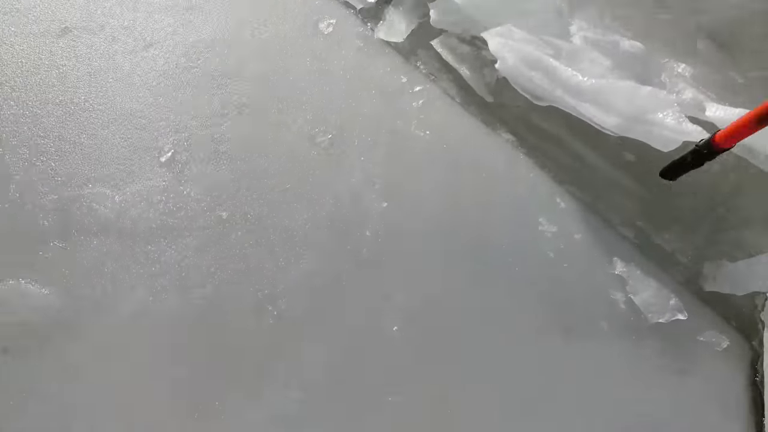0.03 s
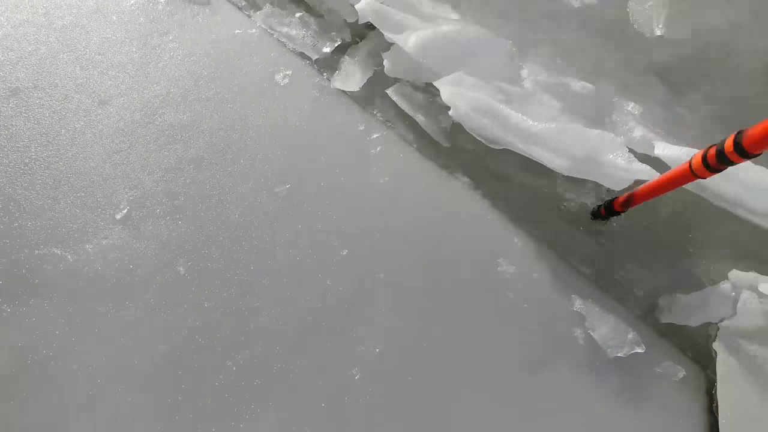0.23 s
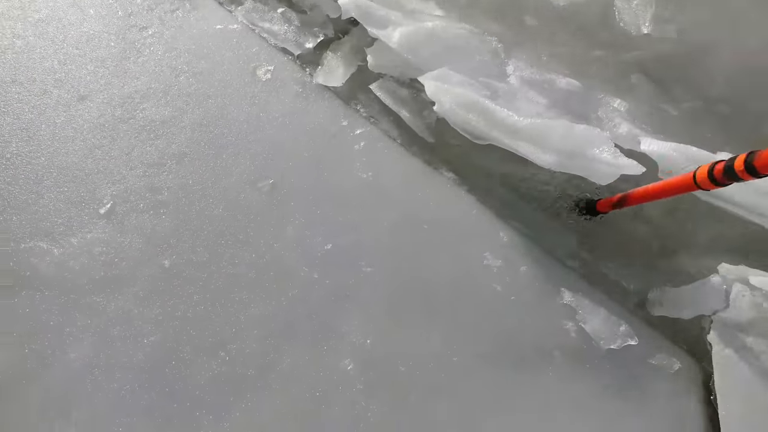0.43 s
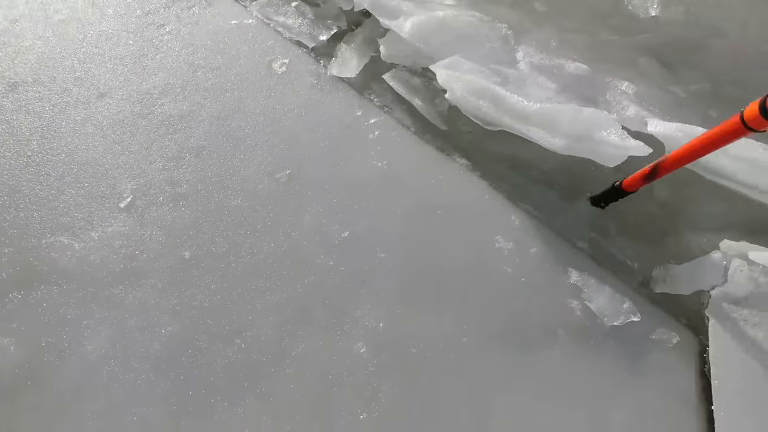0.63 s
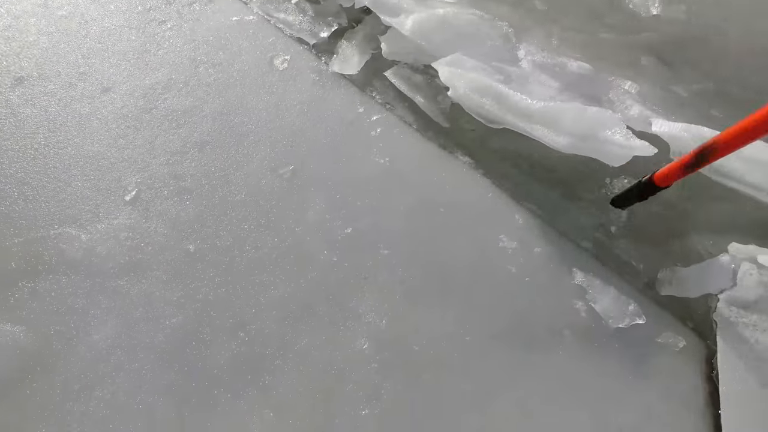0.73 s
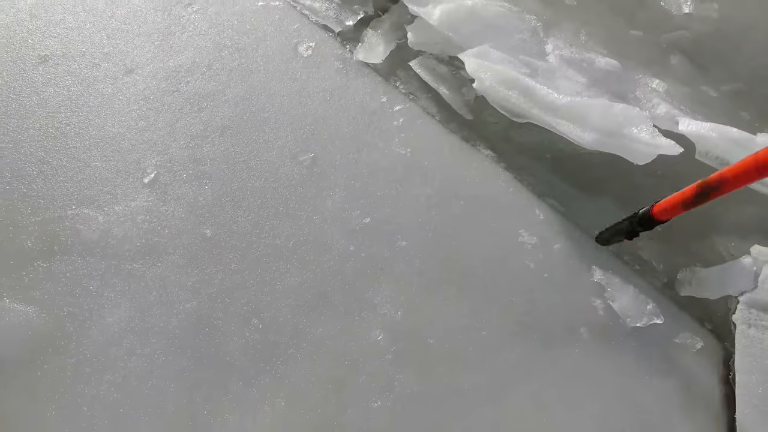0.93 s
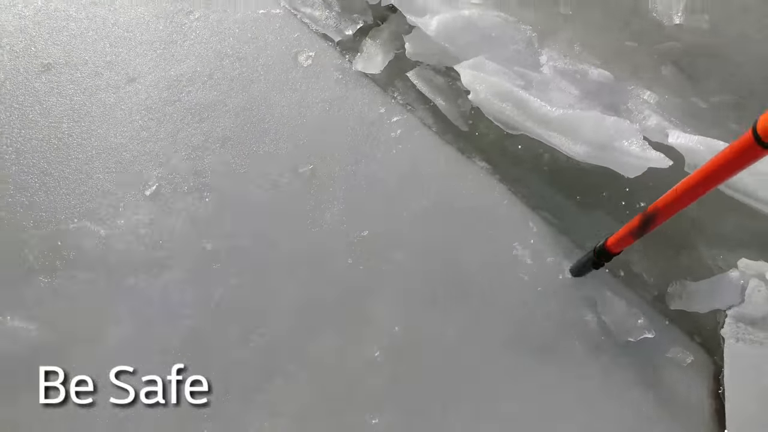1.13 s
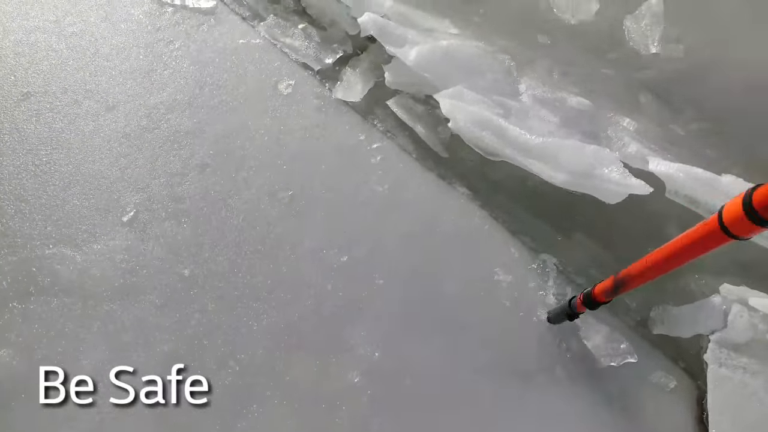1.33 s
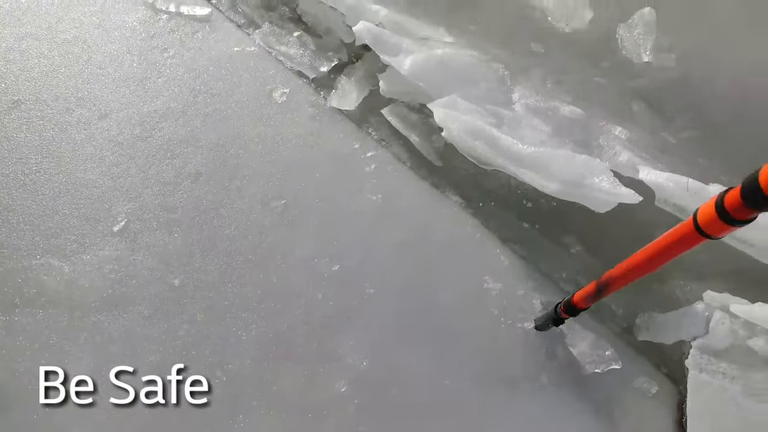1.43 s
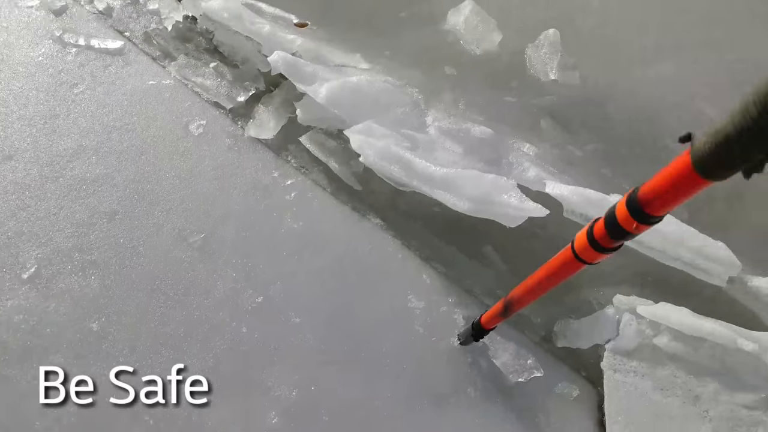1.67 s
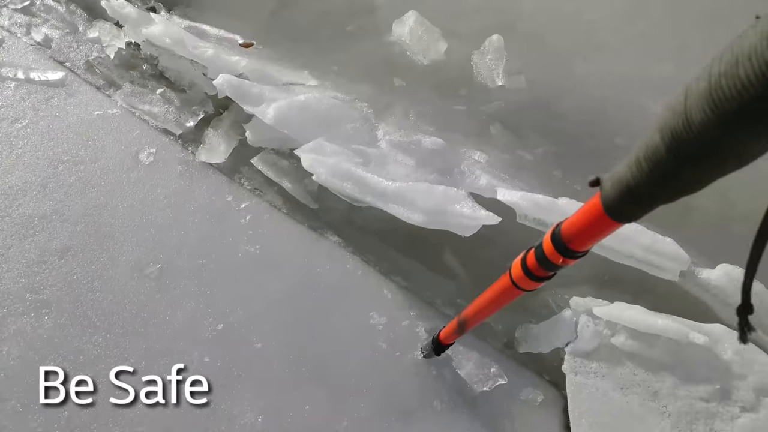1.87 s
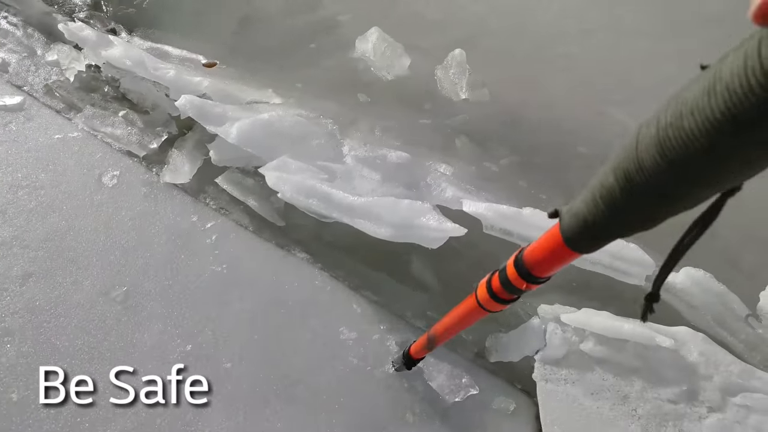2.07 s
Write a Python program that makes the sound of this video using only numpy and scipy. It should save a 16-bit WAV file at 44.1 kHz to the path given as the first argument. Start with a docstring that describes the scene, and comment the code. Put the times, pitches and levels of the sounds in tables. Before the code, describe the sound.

Close, crackling jabs of a pole into wet ice, three in all, the first the longest. Between them the tip grinds through icy grains, chips click and water gulps briefly, over light outdoor wind rumble on the microphone.

```python
"""Pole jabbing thin lake ice.

Three jabs into wet ice near a hand-held microphone, with scraping between them. Each jab is a burst of
tiny fractures that crumbles away. Chips snap and clink, droplets tick, the shaft rings, water gulps in
the hole. Light wind buffets the two microphone ports over a faint outdoor hush."""
import sys
import numpy as np
from scipy import signal
from scipy.fft import rfft, irfft
from scipy.io import wavfile
from scipy.ndimage import uniform_filter1d

SR = 44100
rng = np.random.default_rng(int(sys.argv[2]) if len(sys.argv) > 2 else 0)


def to_wav(sig):
    """Store sig (one row per channel, or 1-D mono) as 16-bit WAV at the path in sys.argv[1].

    Samples outside -1..1 are clipped; the rate is SR.
    """
    pcm = np.clip(np.atleast_2d(sig), -1, 1) * 32767
    pcm = np.round(pcm).astype(np.int16)
    wavfile.write(sys.argv[1], SR, pcm.T)  # frames by channels


N = 92610
T = np.arange(N) / SR
CRACK_HZ = 2500  # nominal pitch of CRACK_SPECTRUM

# Spectra of cracks and of fine splinters. Each row: frequency in Hz, level in dB.
CRACK_SPECTRUM = [(300, -32), (900, -13.5), (1400, -7.5), (1900, 0), (2500, 0), (3100, -3), (3800, -7.5),
                  (6000, -13), (14000, -37)]
SPLINTER_SPECTRUM = [(800, -28.5), (2800, -10.5), (4300, -2.5), (5300, -8.5), (7100, -5), (8300, 3),
                     (9200, 0.5), (11500, -11), (13300, -6.5), (15200, -6.5)]
# Tip dragging through slush. Each row: time in seconds, grinding in dB, fizz in dB.
DRAG_LEVELS = [(0, -68, -55.5), (.08, -84, -67), (.14, -73, -65.5), (.19, -49.5, -54), (.5, -56.5, -54.5),
               (.66, -53, -59), (.79, -59.5, -68), (.83, -96, -68.5), (.95, -75, -63.5), (1.01, -60.5, -55),
               (1.06, -55.5, -50.5), (1.18, -43.5, -75), (1.33, -68.5, -63), (1.4, -46.5, -48.5),
               (1.59, -56, -51), (1.68, -45, -48), (1.74, -57, -69), (1.82, -49.5, -67), (1.9, -62.5, -69),
               (1.97, -95, -92), (2.1, -84, -82)]


def amp(db):
    """Decibels to gain."""
    return 10 ** (np.asarray(db) / 20)


def unit(x):
    """Scale each channel to unit energy."""
    return x / np.sqrt(np.sum(x ** 2, axis=-1, keepdims=True))


def add(track, start_s, sound):
    """Mix a short sound into a track."""
    at = int(np.clip(start_s * SR, 0, N - 1))
    track[..., at:at + sound.shape[-1]] += sound[..., :N - at]


def curve(rows, column):
    """Gain over time from one dB column of a table."""
    rows = np.array(rows)
    return amp(np.interp(T, rows[:, 0], rows[:, column]))


def response(spectrum, size=8192):
    """Minimum-phase impulse response of (Hz, dB) points."""
    hz, db = np.array(spectrum).T
    bin_hz = np.maximum(np.arange(size // 2 + 1) * SR / size, 1)
    gain = amp(np.interp(np.log(bin_hz), np.log(hz), db))
    cepstrum = irfft(np.log(gain))
    cepstrum[1:size // 2] *= 2
    cepstrum[size // 2 + 1:] = 0
    return irfft(np.exp(rfft(cepstrum)))


def through(x, impulse):
    """Convolve each channel with an impulse response."""
    return signal.fftconvolve(np.atleast_2d(x), np.atleast_2d(impulse), axes=-1)[:, :N]


def colour(x, spectrum):
    """Shape a white signal, keeping its power."""
    return through(x, unit(response(spectrum)))


def swell(rise_s):
    """Envelope that peaks at rise_s and dies away."""
    age = T[T < 10 * rise_s] / rise_s
    return age * np.exp(1 - age)


def ping(hz, rise_s, octaves_per_s=0):
    """Short resonance with optional glide."""
    envelope = swell(rise_s)
    pitch_hz = hz * 2 ** (octaves_per_s * T[:len(envelope)])
    return envelope * np.sin(2 * np.pi * np.cumsum(pitch_hz) / SR)


def fractures(per_s, spread_db, pan_spread_db=4.5, lag_spread_s=0.00005):
    """Random micro-fractures, many small and a few large, each from its own direction; rms 1."""
    chance, size = rng.random(N), rng.exponential(size=N)
    lag, pan = rng.standard_normal((2, N))
    at = np.flatnonzero(chance < per_s / SR)
    height = (amp(spread_db * np.minimum(size, 4)) * rng.choice([-1, 1], N))[at]
    side = amp(pan_spread_db * pan[at] / 2)
    left_at = np.clip(at + np.round(lag[at] * lag_spread_s * SR).astype(int), 0, N - 1)
    left, right = np.bincount(left_at, height * side, N), np.bincount(at, height / side, N)
    return unit(np.array([left, right])) * np.sqrt(N)


def stick_slip(per_s=130, depth_db=3.5):
    """The tip catches and slips, so grains come in clumps; gain with rms 1."""
    step = int(SR / per_s)
    held = np.repeat(rng.standard_normal(N // 100), step)[:N]
    grip = np.clip(uniform_filter1d(held, step // 3), -2, 1.5)
    return unit(amp(depth_db * grip)) * np.sqrt(N)


def hush(level_db=-60):
    """Faint, steady outdoor noise."""
    hz_db = [(40, 4.5), (150, -11), (400, -2), (750, -3.5),
             (1500, -14.5), (4000, -28), (8500, -25), (15000, -31)]
    return amp(level_db) * colour(rng.standard_normal((2, N)), hz_db)


def wind(buffet_rise_s=0.0031):
    """Independent rumble on each port, plus single buffets."""
    # Each row: time in seconds, left in dB, right in dB.
    gusts = [(0, -43, -43), (.07, -55, -40.5), (.13, -42.5, -30), (.2, -44, -32), (.26, -33.5, -26),
             (.32, -44.5, -61), (.42, -52, -35.5), (.5, -51, -38), (.63, -55, -36), (.73, -32, -36.5),
             (.81, -57, -50.5), (.93, -55, -49.5), (1.03, -56, -35.5), (1.09, -45, -41), (1.16, -45.5, -54),
             (1.4, -68, -68), (1.445, -55, -57), (1.58, -60.5, -73), (1.8, -49.5, -57.5), (1.93, -49, -50),
             (2, -43.5, -57.5), (2.1, -52.5, -64.5)]
    # Each row: frequency in Hz, level in dB.
    rumble_spectrum = [(20, -43), (30, -20.5), (40, -11.5), (52, -0.5), (72, -1.5), (130, -14), (220, -17),
                       (400, -36.5), (1000, -59.5), (4000, -86)]
    # Each row: start in seconds, level in dB, pitch in Hz, left minus right in dB.
    buffets = [(0.439, -30, 110, -30), (0.531, -31.5, 90, -30), (0.562, -28.5, 85, -23),
               (0.62, -31, 110, -20.5), (0.851, -36, 80, -33.5), (1.016, -37, 70, -23),
               (1.662, -48, 80, 25.5), (1.971, -38, 70, 19)]
    out = colour(rng.standard_normal((2, N)), rumble_spectrum)
    out *= np.array([curve(gusts, column=1), curve(gusts, column=2)])
    for start_s, db, hz, pan_db in buffets:
        gains = amp([db + pan_db / 2, db - pan_db / 2])
        add(out, start_s, np.outer(gains, ping(hz, buffet_rise_s)))
    return out


def droplets(rise_s=0.0019):
    """Droplets tick on the ice."""
    # Each row: start in seconds, relative level in dB.
    landings = [(.02, -64), (.111, -53), (.16, -48), (0.526, -37.5), (.881, -39), (0.954, -43.5),
                (0.98, -46.5), (1.377, -39.5), (2.014, -52.5)]
    envelope = np.zeros(N)
    for start_s, db in landings:
        add(envelope, start_s, amp(db) * swell(rise_s))
    return colour(envelope * rng.standard_normal(N), SPLINTER_SPECTRUM) / 2


def water(left_lag_s=0.00012):
    """Air pockets gulp under the broken ice, near centre."""
    # Each row: start in seconds, level in dB, pitch in Hz, glide in octaves/s, rise in seconds.
    gulps = [(.253, -22.5, 315, -2.5, 0.0075), (.302, -19, 786, 8, 0.0022),
             (.313, -20.5, 297.6, -12, 0.0053), (0.35, -26.5, 262, -13, 0.0073),
             (.385, -39.5, 284, 11, 0.0074), (.427, -35.5, 350, 4.5, 0.0049), (.56, -34, 314, -21, 0.0034),
             (.645, -43, 348, -8, 0.0038), (.868, -39.5, 274, 6.5, 0.004), (.92, -47.5, 285, 5, 0.0038),
             (.997, -41.5, 1495, 45.5, 0.0033), (1.075, -22.5, 743, -0.5, 0.0035),
             (1.081, -30, 164, -5, 0.0048), (1.172, -46, 430, 3, .003), (1.418, -44.5, 167, -8, 0.0051),
             (1.844, -45.5, 268, 0, 0.013), (1.853, -44, 558, 5, 0.0036), (1.966, -50.5, 450, 2.5, .005)]
    out = np.zeros(N)
    for start_s, db, hz, glide, rise_s in gulps:
        add(out, start_s, amp(db) * ping(hz, rise_s, glide))
    return np.array([np.interp(T - left_lag_s, T, out), out])


def pole(contact, coupling_db=-26):
    """The shaft rings faintly with whatever its tip meets."""
    # Each row: frequency in Hz, relative level in dB, T60 in seconds.
    modes = [(710, -10.5, .1), (790, -4, .1), (1202, 5.5, .12), (1880, -6.5, 0.11), (2010, 0.5, .09),
             (2315, -18, .12), (2475, -8.5, .14), (2640, -6.5, 0.046), (3060, -12, .1), (4280, -2, .06),
             (9100, -3.5, .04)]
    t = T[:SR // 2]
    ring = sum(amp(db - 60 * t / t60_s) * np.sin(2 * np.pi * hz * t) for hz, db, t60_s in modes)
    return amp(coupling_db) * through(contact, unit(ring)) / 2


def scrape():
    """The tip grinds in fits through wet grains of ice."""
    grains = fractures(per_s=940, spread_db=4)
    grinding = colour(grains * stick_slip() * curve(DRAG_LEVELS, column=1), CRACK_SPECTRUM)
    fizz = colour(grains * curve(DRAG_LEVELS, column=2), SPLINTER_SPECTRUM)
    return grinding + fizz


def clinks(per_s=230, base_db=-0.5, spread_db=4, decay_s=0.0024, spread_octaves=0.64):
    """Loose grains pushed aside by the tip knock together, each at its own pitch."""
    out, t = np.zeros(N), T[:SR // 64]
    for when, pitch, size in rng.random((int(per_s * N / SR), 3)):
        hz = CRACK_HZ * 2 ** (spread_octaves * (2 * pitch - 1))
        gain = amp(base_db + spread_db * min(-np.log(1 - size), 2))
        add(out, when * N / SR, gain * np.exp(-t / decay_s) * np.sin(2 * np.pi * hz * t))
    return out * curve(DRAG_LEVELS, column=1)


def chips(rise_s=0.00067, roughness=0.3, snap_db=-19):
    """Chips break off or collide: a rough, quickly damped clink and a bright snap."""
    # Each row: start in seconds, relative level in dB, pitch in Hz.
    hits = [(.196, -29.5, 2440), (.2192, -13, 2100), (.3185, -32, 2530), (.3705, -15.5, 1870),
            (.474, -36, 2540), (.5695, -33, 2600), (.6735, -29.5, 2800), (.695, -23, 2490),
            (.702, -24, 2340), (1.074, -12, 2450), (1.0947, -14, 2570), (1.136, -22, 2480),
            (1.1495, -19, 2580), (1.164, -14, 2840), (1.433, -12.5, 2500), (1.4612, -12.5, 2380),
            (1.477, -31, 2280), (1.493, -22.5, 2160), (1.527, -32, 2300), (1.65, -22, 2550),
            (1.6771, -23.5, 2750), (1.696, -26, 2870), (1.8055, -23.5, 2990), (1.8305, -31.5, 3140)]
    clink, envelope = np.zeros((2, N))
    for start_s, db, hz in hits:
        add(clink, start_s, amp(db) * ping(hz, rise_s))
        add(envelope, start_s, amp(db) * swell(rise_s))
    rasp = roughness * colour(envelope * rng.standard_normal(N), CRACK_SPECTRUM)
    snap = amp(snap_db) * colour(envelope * rng.standard_normal(N), SPLINTER_SPECTRUM)
    return (clink + rasp + snap) / 2


def crunches(crumble_db=-16, crumble_db_per_s=124):
    """Dense fractures while the tip pushes in, sparser debris after; thicker ice cracks lower."""
    # Each row: start, rise and hold in seconds, fall in dB/s, slab, crack and splinter levels in dB,
    # crack pitch in Hz.
    bursts = [(0.2175, 0.0024, 0.016, 600, -27.5, -19.5, -22.5, 2350),
              (0.239, 0.007, 0.026, 1000, -29.5, -29, -30, 2300),
              (0.293, .004, 0.024, 700, -30, -25, -28.5, 2260),
              (0.333, 0.0025, 0.0068, 894, -28, -27.5, -31, 2300),
              (0.3933, .002, .006, 450, -41, -34.5, -31, 2600),
              (0.434, .003, 0.0034, 600, -52, -46, -40, 2670),
              (0.566, 0.00076, 0.0025, 509, -50, -47, -43.5, 2630),
              (0.625, .001, .009, 700, -51.5, -47.5, -49.5, 2930),
              (0.687, 0.0034, 0.015, 1100, -52, -40, -53, 2520),
              (0.743, .002, 0.0045, 700, -53, -45.5, -65, 2800),
              (0.764, 0.0022, 0.009, 560, -57, -43, -52.5, 1950),
              (0.999, .002, 0.0052, 599, -55, -51.5, -56, 2000),
              (1.0718, 0.00064, 0.0097, 951, -27, -22.5, -19.5, 2495),
              (1.088, .002, .004, 452, -44, -28, -26, 2600),
              (1.118, 0.0016, .003, 898.5, -39, -32.5, -30.5, 2510),
              (1.2446, .001, 0.0037, 278.5, -52.5, -35, -31, 2573),
              (1.299, .003, 0.0039, 801, -78, -53.5, -40, 2550),
              (1.41, .004, 0.0061, 1200.5, -31, -25, -17.5, 2450),
              (1.443, 0.0036, 0.0048, 297, -42, -33, -42, 2400),
              (1.497, 0.0045, 0.0031, 706, -49, -42.5, -35, 2180),
              (1.622, 0.0025, 0.0051, 800.5, -73, -33.5, -35, 2860),
              (1.754, 0.0046, 0.0042, 1100, -71, -38, -41, 3050),
              (1.836, .005, 0.021, 500, -52, -64, -71, 2400),
              (1.899, .002, .004, 702, -49, -74, -64.5, 1924),
              (1.965, .001, .004, 602, -61, -80.5, -84, 1985)]
    # Each row: frequency in Hz, level in dB.
    slab_spectrum = [(60, -11.5), (160, -4), (300, 1), (460, -7), (750, 1), (1100, -1.5), (1700, -6.5),
                     (4000, -53.5)]
    dense = fractures(per_s=5000, spread_db=2)
    debris = fractures(per_s=500, spread_db=4) * stick_slip()
    cracks, slab, splinters = np.zeros((3, 2, N))
    length = SR // 3
    age_s = T[:length]
    for start_s, rise_s, hold_s, fall_db_per_s, slab_db, crack_db, splinter_db, hz in bursts:
        onset = np.minimum(age_s / rise_s, 1)
        after_s = np.maximum(age_s - rise_s - hold_s, 0)
        push = onset * amp(-fall_db_per_s * after_s)
        crumble = onset * amp(crumble_db - crumble_db_per_s * after_s)
        low, mid, high = (push * dense[:, i:i + length] + crumble * debris[:, i:i + length]
                          for i in rng.integers(N - length, size=3))
        tuned = [(f * hz / CRACK_HZ, db) for f, db in CRACK_SPECTRUM]
        add(slab, start_s, amp(slab_db) * low)
        add(cracks, start_s, amp(crack_db) * through(mid, unit(response(tuned, size=512))))
        add(splinters, start_s, amp(splinter_db) * high)
    return cracks + colour(slab, slab_spectrum) + colour(splinters, SPLINTER_SPECTRUM)


def path_to_ports(x, left_lag_s=0.00035, scatter_db=-8, scatter_t60_s=0.028):
    """Brief nearby reflections; the left port hears later, with more upper mids and less bass."""
    # Each row: frequency in Hz, left minus right in dB.
    balance = [(100, -36), (350, -2), (700, 1), (1300, 7.5), (2400, 8), (4400, -2.5), (8100, 2), (15000, 2)]
    t = T[:SR // 8]
    scatter = unit(rng.standard_normal((2, len(t))) * amp(-60 * t / scatter_t60_s))
    scatter = signal.sosfilt(signal.butter(2, 900, "high", fs=SR, output="sos"), scatter)
    left, right = x + amp(scatter_db) * through(x, scatter)
    left = np.interp(T - int(left_lag_s * SR) / SR, T, left)
    shading = [response([(hz, sign * db / 2) for hz, db in balance]) for sign in (1, -1)]
    return through(np.array([left, right]), np.array(shading))


def scene():
    """Ice, pole and water in the open air; stereo."""
    air = wind() + hush()
    ice = crunches() + scrape() + chips() + clinks() + droplets()
    return path_to_ports(ice + pole(ice)) + water() + air


def record(dry, low_cut_hz=43, high_cut_hz=15500):
    """Microphone with a treble notch; deepest bass and top are cut."""
    # Each row: frequency in Hz, gain in dB.
    mic_response = [(20, -2), (9600, 0), (9950, -5.5), (10350, -16.5), (10900, -15), (11400, -1.5),
                    (20000, -6)]
    low_cut = signal.butter(3, low_cut_hz, "high", fs=SR, output="sos")
    high_cut = signal.ellip(8, 0.2, 70, high_cut_hz, fs=SR, output="sos")
    heard = through(dry, response(mic_response))
    return signal.sosfilt(high_cut, signal.sosfilt(low_cut, heard))


dry = scene()
out = record(dry)
to_wav(out)
```